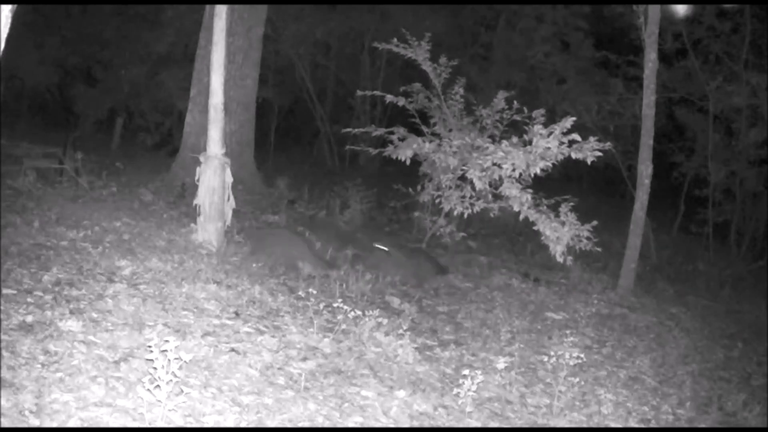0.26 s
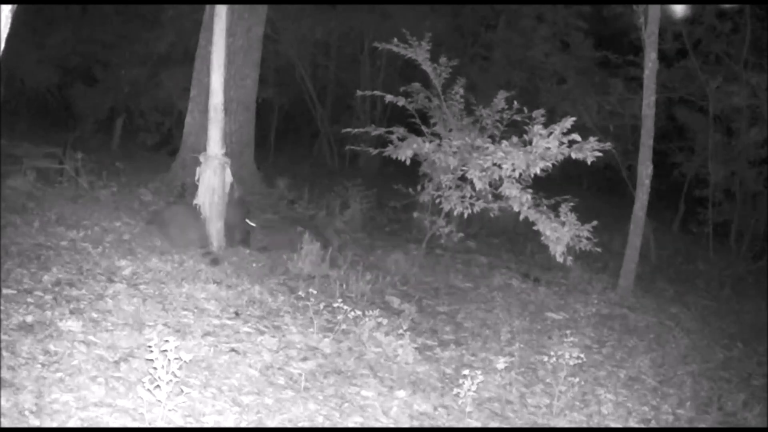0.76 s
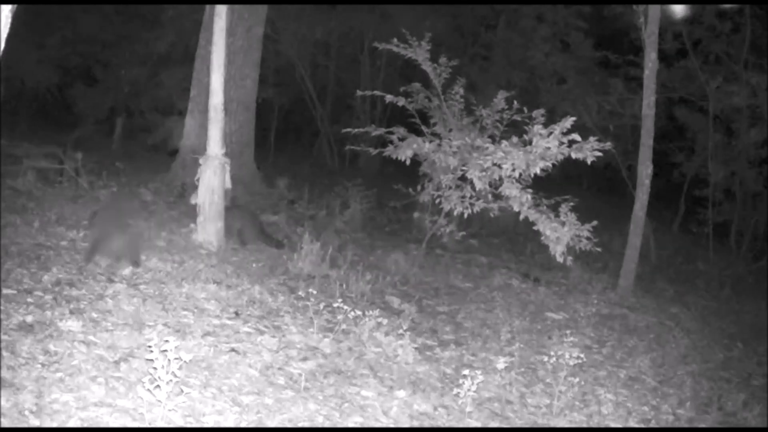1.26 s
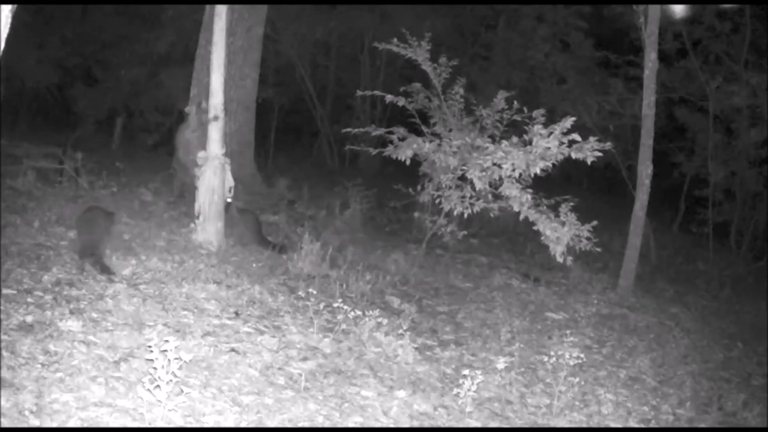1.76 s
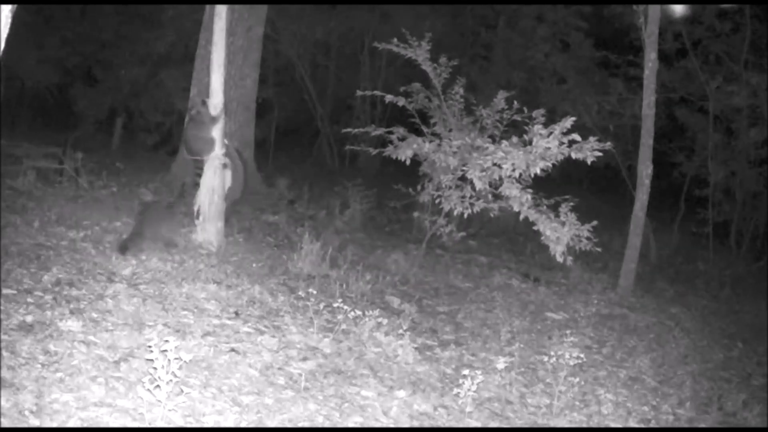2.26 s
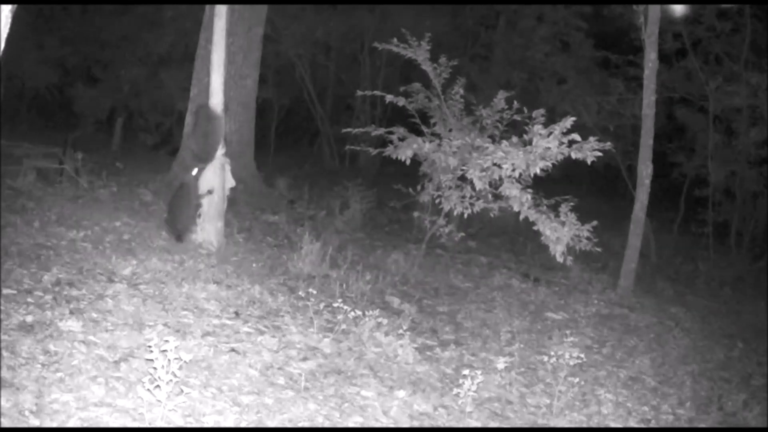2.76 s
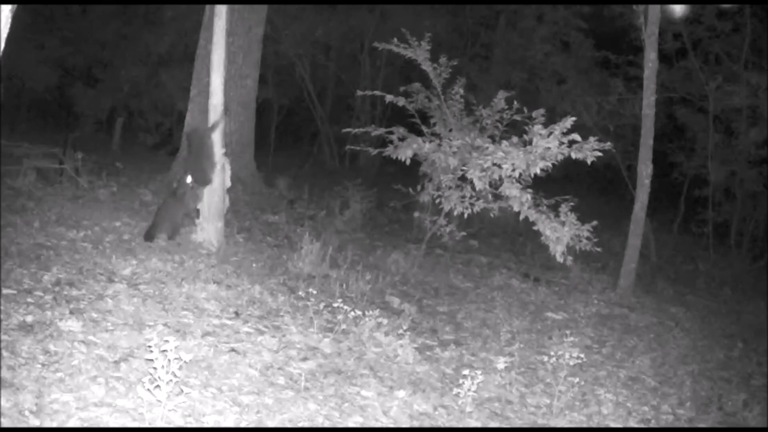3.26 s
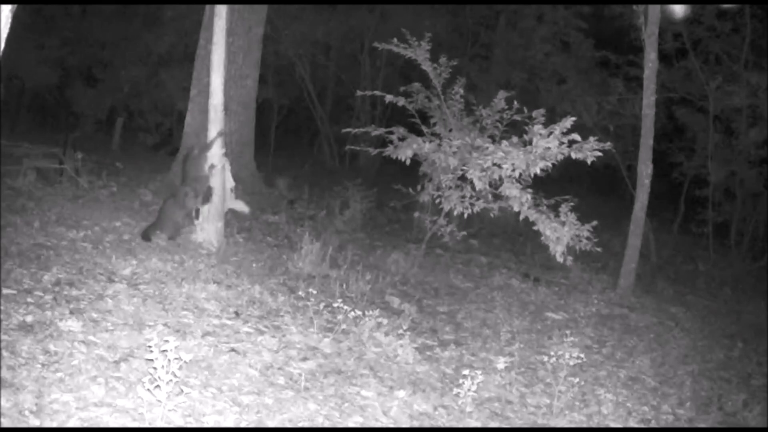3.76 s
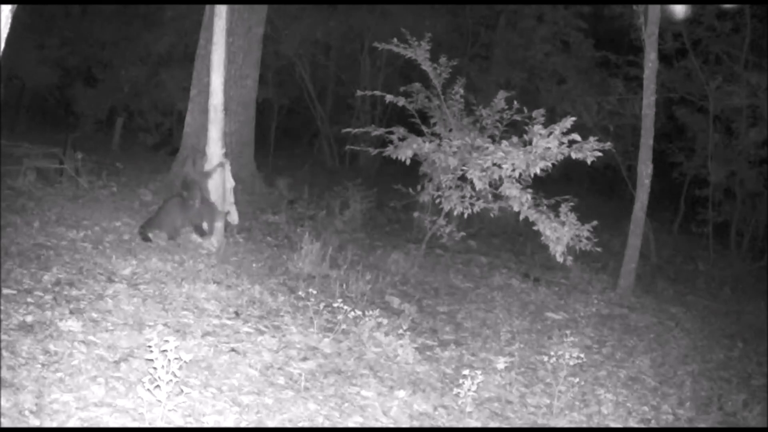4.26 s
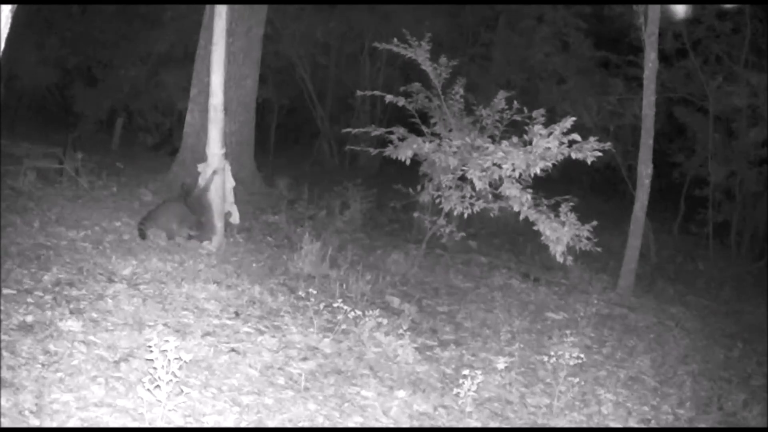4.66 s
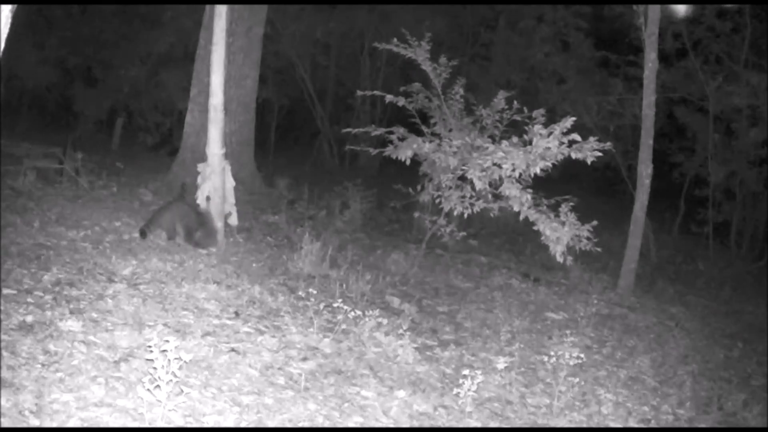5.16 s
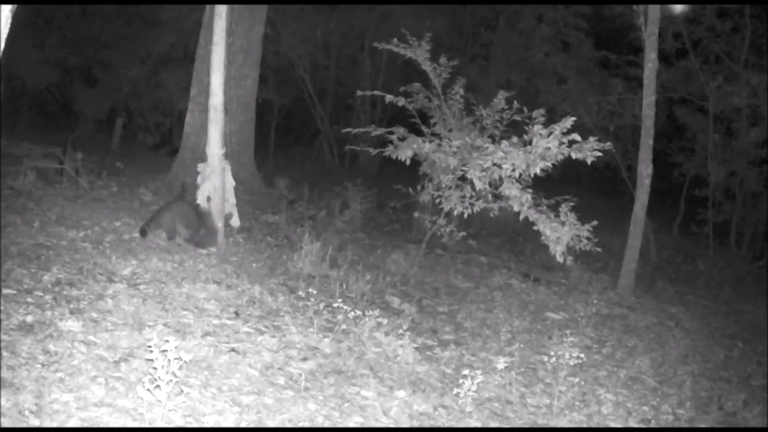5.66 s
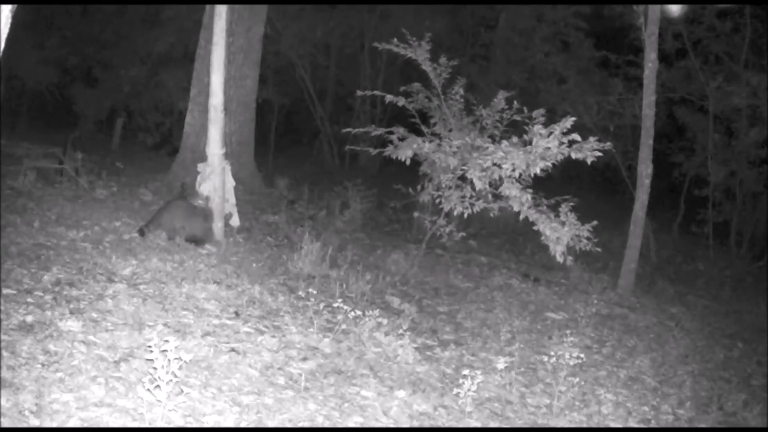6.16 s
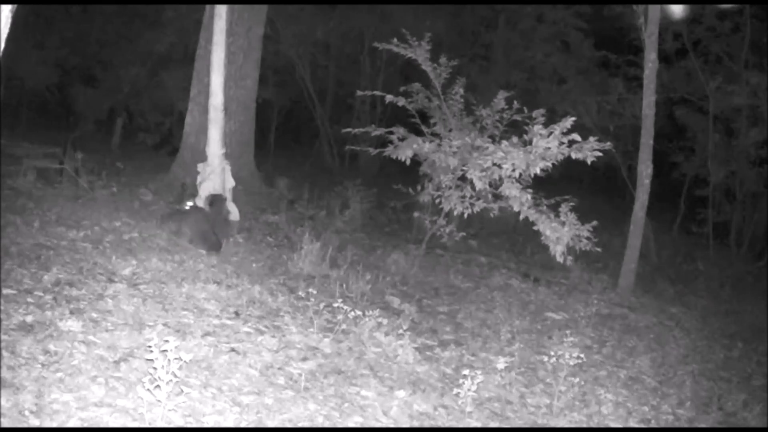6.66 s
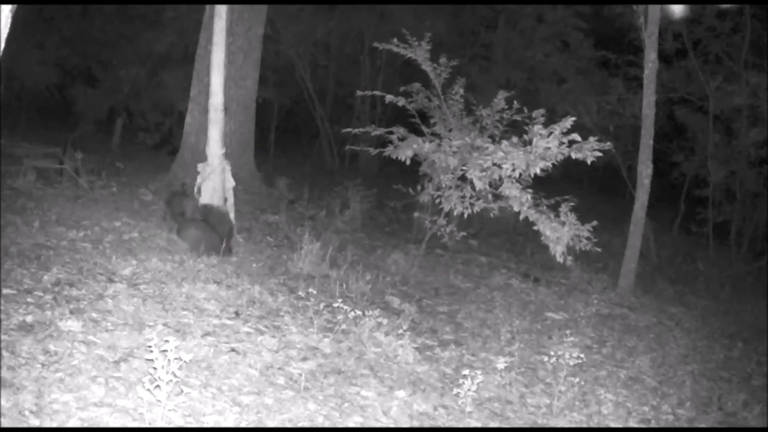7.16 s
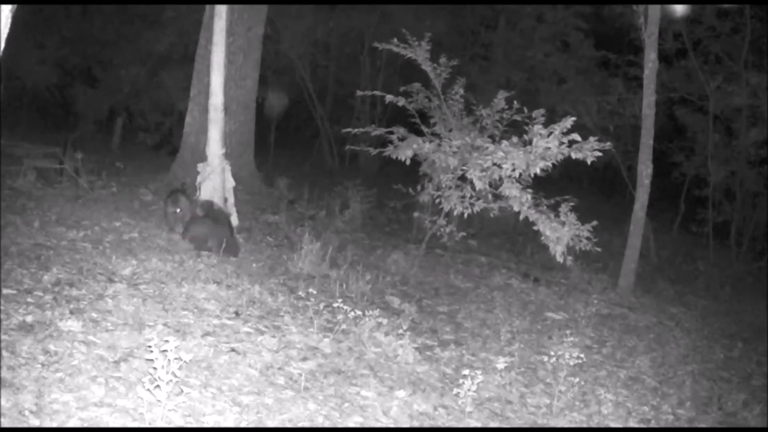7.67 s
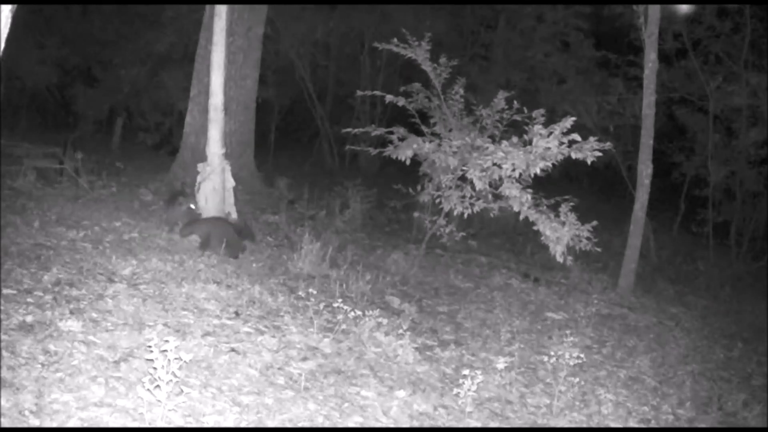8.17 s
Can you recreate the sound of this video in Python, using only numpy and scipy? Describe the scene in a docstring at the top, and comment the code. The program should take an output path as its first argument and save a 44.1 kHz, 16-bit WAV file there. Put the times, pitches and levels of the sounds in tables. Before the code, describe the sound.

Continuous shrill crickets pulse together outdoors at night, with fainter lower and higher insect trills behind. A katydid repeats short four-part rasps, answered once by a second. Over this, animals scuffling by a tree crack twigs with tiny dry clicks and ticks, busiest in the first half, and crush leaves briefly near the start. Faint airy hiss and mains-like hum sit underneath. Narrow-band single microphone, slight woodland blur, no voices.

```python
"""A wood at night: a dense chorus of high crickets throbs, with fainter tree crickets low and ground crickets
a little above. Two katydids rasp phrases of four strokes; animals scuffle in leaves, snap twigs, bump softly.
Cricket strokes are short sinking tones; katydid teeth excite wing resonances; twigs are decaying modes,
leaves bursts of filtered crackle, and bumps sinking tones. Far air is shaped noise, and mains and
machinery hum is steady sines. One microphone with a narrow band feeds both channels."""
import sys
import numpy as np
from scipy import signal
from scipy.fft import rfft, irfft, next_fast_len
from scipy.io import wavfile
from scipy.ndimage import uniform_filter1d, map_coordinates

SR = 44100
rng = np.random.default_rng(int(sys.argv[2]) if len(sys.argv) > 2 else 0)


def transcribe(u):
    """Save the signal u as a 16-bit wav file named by the first command-line argument.

    u: samples, shape (n,) or (channels, n), limited to [-1, 1]; the rate is SR.
    q: integer samples, one column per channel.
    """
    v = np.clip(np.atleast_2d(u).T, -1, 1)
    q = np.round(v * 32767).astype(np.int16)
    wavfile.write(sys.argv[1], SR, q)


def elevation(decibels):
    """Turn decibel levels (scalar or array-like) into linear amplitude ratios."""
    levels = np.asarray(decibels, float)
    return 10 ** (levels / 20)


N = 370881  # length [samples]

# High crickets: (time [s], level before throb [dB], swing of the common throb either way [dB])
HIGH_CHORUS = [(0, -51, 2.5), (.8, -50, 1), (1.9, -51, 1), (2.3, -51, -2), (3.1, -50, 2), (4.2, -51.5, 1.5),
               (5.5, -51, 2), (6.6, -50, 1), (7.7, -52, 0.8), (8.41, -49, 2)]
# Fainter choruses: tree crickets, low, and ground crickets, a little above the high ones:
# (time [s], tree cricket level [dB], ground cricket level [dB])
FAINTER_CHORUSES = [(0, -66.5, -58), (.5, -68.5, -61.5), (1, -70.5, -63), (2.3, -69.5, -60.5),
                    (3.7, -69.5, -63.5), (4.8, -68.5, -61), (5.4, -69, -63.5), (6, -67.5, -62.5),
                    (6.8, -69, -62.5), (7.4, -66, -63), (8.41, -68.5, -57.5)]
# Common throb before and after the regrouping: (time of a crest [s], crest to crest [s])
THROB_BOUTS = [(0.084, 0.361), (2.839, .357)]
# Phrases of four wing strokes:
# (time [s], level of first stroke before scatter [dB], stroke to stroke [s], change per stroke [dB])
FIRST_PHRASES = [(.224, -60.5, 0.093, 1), (1.538, -55.5, .094, -1), (3.018, -59, 0.098, 0),
                 (4.548, -60, 0.095, 0.6), (6.031, -58.5, 0.097, 0.1), (7.461, -60.5, 0.098, 1)]
SECOND_PHRASES = [(3.858, -58, 0.081, -0.96)]  # second katydid, same columns
# Wing resonances: (frequency [Hz], width [Hz], relative gain [dB], delay within the stroke [s])
FIRST_WING = [(3220, 400, -4.5, .01), (3710, 450, -2.5, 0.0069), (3970, 140, -1, 0.0027),
              (4184, 100, 1.5, 0.011), (4390, 120, -1, 0.001), (4510, 120, 3, -0.017),
              (4716, 130, 3, -.006), (4920, 260, 0.5, -.008), (5350, 640, -6, -.008)]
SECOND_WING = [(3430, 270, -2.5, 0.001), (5000, 900, -8.5, 0.001)]  # second katydid, same columns
# Paws in the leaves: (time [s], length [s], level [dB], centre [Hz], width [Hz])
LEAF_SCUFFS = [(0.532, 0.085, -61.5, 1700, 1200), (0.534, 0.079, -61, 4200, 2000),
               (0.924, 0.11, -63.5, 3000, 4000), (1.286, 0.038, -48, 6760, 4000),
               (1.289, 0.21, -60, 3000, 5000), (1.292, .03, -61, 1400, 2000),
               (1.432, .06, -64.5, 1500, 2000), (1.34, 0.039, -59, 5000, 3000),
               (1.428, 0.021, -51, 5540, 5000), (1.451, 0.052, -54, 5000, 6000),
               (2.199, 0.038, -66.5, 990, 1200), (2.656, 0.23, -64.5, 2500, 3500),
               (3.203, 0.21, -64, 1490, 2000), (4.674, 0.05, -62.5, 1300, 1600),
               (4.74, 0.088, -65, 1500, 1800), (7.087, 0.018, -63.5, 1750, 400),
               (7.135, 0.031, -66, 4000, 2000)]
# Louder twig snaps: (time [s], body level [dB], thud level [dB], crack level [dB], body pitch [Hz], body t60 [s])
TWIG_SNAPS = [(0.060, -47, -47.5, -46, 1670, 0.0043), (.534, -56, -46.5, -60, 1750, .004),
              (.552, -49, -60, -61, 1690, .004), (1.294, -45.5, -58, -50, 900, .003),
              (1.437, -55, -65, -58, 1800, .003), (2.046, -54, -50, -56, 1200, .004),
              (2.066, -34.5, -39.5, -39, 1630, 0.0036), (2.152, -49, -55, -60, 1060, 0.004),
              (2.3508, -38, -58, -48, 1560, 0.003), (2.611, -46, -66, -62, 1440, 0.0037),
              (2.9226, -36.5, -34, -33, 1530, 0.0047), (2.984, -53, -62, -60, 1420, .004),
              (3.193, -40.5, -63, -57, 1530, 0.0035), (3.22, -46.5, -65, -41.5, 985, .004),
              (3.311, -47, -60, -55, 950, .004), (3.701, -51, -52, -57, 1760, .004),
              (3.732, -44, -62, -58, 1420, 0.0039), (3.7785, -35, -54, -46, 1220, 0.0022),
              (4.049, -44, -64, -52, 1840, 0.004), (4.122, -48, -67, -45, 1750, .005),
              (4.415, -55, -61, -52, 942, 0.0037), (4.681, -53, -69, -52, 1500, .003),
              (4.695, -50, -63, -50, 2300, .003), (4.698, -45, -54, -56, 1500, .004),
              (4.796, -53, -54, -59, 1500, .004), (5.687, -46, -59, -63, 1600, .003),
              (6.474, -51, -65, -52, 1020, .004), (6.604, -49.5, -53, -41, 1090, 0.0033),
              (7.0568, -47, -74, -56, 1950, 0.0034), (7.0685, -52, -75, -65, 2250, .008),
              (7.0703, -46, -76, -56, 1800, 0.013), (7.251, -51, -67, -63, 2080, .004),
              (8.132, -50, -54, -62, 1220, 0.0027), (8.248, -42, -54, -39, 1280, 0.0038)]
# Soft low bumps: (time [s], length [s], level before roughness [dB], first pitch [Hz], last pitch [Hz])
SOFT_BUMPS = [(0.546, 0.02, -52.5, 130, 100), (3.698, .013, -52, 270, 190), (4.308, 0.021, -60, 200, 150),
              (6.263, 0.01, -55.5, 343, 261), (8.339, .038, -59.5, 450, 367)]
# Hum lines: (frequency [Hz])
HUM_PITCHES = [42.57, 59.2, 85.1, 119.98, 240.05, 360.05]
# The same lines in turn: (rms level [dB], scale of phase wander [rad])
HUM_LINES = [(-68.5, 0.22), (-77, 0.41), (-80, 0.56), (-65.5, 0.025), (-79, 0.064), (-87.5, .1)]
# Spectrum of the far air: (frequency [Hz], relative level per Hz [dB])
AIR_SPECTRUM = [(9, -37.5), (15, -14), (48, -3.5), (92, -8.5), (160, -13), (250, -17.5), (340, -19),
                (1750, -22), (3000, -21.5), (5600, -23), (8000, -21.5)]
# Loudness of the far air: (time [s], level [dB])
AIR_LOUDNESS = [(0, -57), (1.5, -56.5), (2.6, -58), (3.9, -57), (5.5, -58.5), (6.2, -57.5), (8.41, -58)]
# Microphone response: (frequency [Hz], gain [dB])
MICROPHONE_RESPONSE = [(5600, 1), (7400, 0), (7800, -5.5), (8050, -18.5), (8220, -25), (8320, -52.5)]
# Twig thud: (frequency [Hz], t60 [s]); crack modes: (frequency [Hz], t60 [s], level against the crack [dB])
THUD, CRACK = (525, 0.0042), [(3000, 0.0029, -4.5), (4260, 0.004, -4)]

FLATTER_SINGERS_DB, FLUTTER_DB = -10, 0.8  # flatter high crickets against the rest; chance unevenness
REGROUP_S, THROB_LEAN_RAD = 2.25, 0.21  # start of the second bout; skew of the throb
STROKE_S, LAST_STROKE_S, STROKE_EDGE_S = 0.06, 0.065, 0.025  # the last stroke is drawn out
STROKE_SCATTER_DB, MODE_WAVER_DB = -0.27, -1  # no two strokes are alike
TOOTH_RATE_HZ, TOOTH_JITTER = 402, .11  # teeth a second; scatter of a gap, as a share of the mean
TOOTH_SCATTER_DB, SCRAPE_DB = 2.5, -14  # scatter of tooth size; friction noise against the teeth
FAINT_SNAPS, FAINT_T60_S, FAINT_HZ = 6, .0046, (950, 1750)  # number; ring; range of body pitch
FAINT_DB, FAINT_SPREAD_DB = (-56.5, -64, -62), 1  # body, thud, crack; spread either way
SNAP_RISE, SNAP_LOW_HZ = 0.041, 190  # rise time over t60; low cut
SPLINTER_DB, SPLINTER_T60_S = -11.5, 0.034  # splintering noise against the body; its decay
BUMP_ROUGH_DB = 3  # unevenness within a bump


def unit(x):
    """Normalisation: divides by the root mean square."""
    return x / np.sqrt(np.mean(x ** 2) + 1e-20)


def along(points, hz):
    """Logarithmic pitch: interpolates (frequency, value) points on a log axis."""
    f, v = np.transpose(points)
    return np.interp(np.log(hz + 1), np.log(f + 1), v)


def curves(rows):
    """Linear interpolation: one value per sample for each column after the time."""
    s, *cols = np.transpose(rows)
    return [np.interp(np.arange(N) / SR, s, c) for c in cols]


def wobble(rate):
    """Band-limited chance: a smooth random curve through rate knots a second."""
    knots = rng.standard_normal(int(N * rate / SR) + 4)
    return map_coordinates(knots, [np.arange(N) * rate / SR])


def filtered(x, response):
    """Linear filtering: multiplies the spectrum by a complex frequency response."""
    m = next_fast_len(len(x) + 8192)
    return irfft(rfft(x, m) * response(np.fft.rfftfreq(m, 1 / SR)), m)[:len(x)]


def resonance(f, hz, width):
    """Damped oscillator: the causal response of one mode."""
    return 1j * f * width / (hz * hz - f * f + 1j * f * width)


def woods(x, t60, wet):
    """Multiple scattering: trunks and moving leaves blur a sound, with a new tail every fifth of a second."""
    hop = SR // 5
    count = N // hop + 2
    padded = np.pad(x, (hop, 2 * hop))
    pieces = np.lib.stride_tricks.sliding_window_view(padded, 2 * hop)[::hop][:count]
    window = np.sin(np.pi * np.arange(2 * hop) / (2 * hop))
    tails = rng.standard_normal((count, hop)) * elevation(-60 * np.arange(hop) / SR / t60)
    tails = tails / np.linalg.norm(tails, axis=1, keepdims=True)
    blur = signal.fftconvolve(pieces * window, tails, axes=1)
    where = hop * np.arange(count)[:, None] + np.arange(blur.shape[1])
    scattered = np.bincount(where.ravel(), blur.ravel())[hop:hop + N]
    wet = np.clip(wet, 0, 1)
    return np.sqrt(1 - wet) * x + np.sqrt(wet) * scattered


def trill(count, hz, spread_hz, scatter_hz, rate, rate_spread, stroke_s, fall_hz, wander_db):
    """Stridulation: each cricket closes its wings at its own rate, every stroke a short tone sinking in pitch."""
    beats = np.arange(int(1.5 * 80 * N / SR))  # ample strokes to fill the scene
    pace = rate * np.exp(rate_spread * rng.standard_normal((count, 1)))
    size, detune, phase, late = rng.standard_normal((4, count, len(beats)))
    start = (beats + rng.random((count, 1)) + np.cumsum(.03 * late, axis=1)) / pace
    # each singer swells and fades
    mood = unit(uniform_filter1d(rng.standard_normal(size.shape), size=30, axis=1))
    pitch = hz + spread_hz * np.linspace(-1, 1, count)[:, None] + scatter_hz * detune
    heard = (start > 0) & (start < N / SR)
    t = np.arange(int(stroke_s * SR)) / SR
    shape = np.sin(np.pi * (t / stroke_s) ** 0.8)
    turns = pitch[heard][:, None] * t + fall_hz * (t - t ** 2 / stroke_s) / 2 + phase[heard][:, None]
    strength = elevation(wander_db * mood + 0.5 * size)[heard][:, None]
    tones = strength * shape * np.sin(2 * np.pi * turns)
    where = (start[heard] * SR).astype(int)[:, None] + np.arange(len(t))
    return np.bincount(where.ravel(), tones.ravel(), N)[:N]


def crickets():
    """Incoherent addition: many singers at three main pitches blur together; the high ones throb in step."""
    chorus_db, depth_db = curves(HIGH_CHORUS)
    tree_db, ground_db = curves(FAINTER_CHORUSES)
    t = np.arange(N) / SR
    first_bout, second_bout = [(t - crest) / period for crest, period in THROB_BOUTS]
    turn = 2 * np.pi * np.where(t < REGROUP_S, first_bout, second_bout)
    # the lean makes a swell of positive depth rise faster than it falls
    throb_db = depth_db * np.cos(turn + THROB_LEAN_RAD * np.cos(turn)) + FLUTTER_DB * wobble(9)
    high = trill(count=20, hz=6376, spread_hz=117, scatter_hz=73, rate=70, rate_spread=.2,
                 stroke_s=0.0075, fall_hz=200, wander_db=0.04)
    flatter = trill(count=8, hz=6066, spread_hz=90, scatter_hz=80, rate=70, rate_spread=.2,
                    stroke_s=0.007, fall_hz=200, wander_db=1.0)
    high = unit(high) + elevation(FLATTER_SINGERS_DB) * unit(flatter)
    tree = trill(count=10, hz=2291, spread_hz=68.0, scatter_hz=36.4, rate=62, rate_spread=.03,
                 stroke_s=.011, fall_hz=106, wander_db=0.3)
    ground = trill(count=14, hz=6760, spread_hz=350, scatter_hz=265, rate=49, rate_spread=.015,
                   stroke_s=0.006, fall_hz=585, wander_db=1.0)
    return (elevation(chorus_db + throb_db) * unit(woods(high, t60=0.38, wet=0.23))
            + elevation(tree_db) * unit(woods(tree, t60=0.28, wet=0.25))
            + elevation(ground_db) * unit(woods(ground, t60=0.54, wet=0.67)))


def night_air():
    """Superposition: shaped noise makes far rumble and patchy hiss; sines make the mains and machinery hum."""
    z = signal.stft(rng.standard_normal(N + 512), nperseg=512)[2]
    patches = uniform_filter1d(rng.standard_normal(z.shape), size=8, axis=0)  # across frequency
    patches = uniform_filter1d(patches, size=6, axis=1)  # across time
    noise = signal.istft(z * elevation(1.66 * unit(patches)), nperseg=512)[1][:N]
    coloured = unit(filtered(noise, lambda f: elevation(along(AIR_SPECTRUM, f))))
    air = elevation(curves(AIR_LOUDNESS)[0] + 0.63 * wobble(3.016)) * coloured
    t = np.arange(N) / SR
    drift = wobble(1.5)  # shared by all lines
    hum = np.zeros(N)
    for hz, (db, wander) in zip(HUM_PITCHES, HUM_LINES):
        phase = wander * drift + 2 * np.pi * rng.random()
        hum += elevation(db) * np.sqrt(2) * np.sin(2 * np.pi * hz * t + phase)
    return air + hum


def twigs():
    """Modal decay: a snap rings the stick's body, with a thud below and a crack above; faint ones fall by chance."""
    luck = rng.random((FAINT_SNAPS, 5))
    faint_db = np.array(FAINT_DB) + FAINT_SPREAD_DB * (2 * luck[:, 1:4] - 1)
    faint_hz = np.interp(luck[:, -1], [0, 1], FAINT_HZ)
    faint = np.column_stack([luck[:, 0] * N / SR, faint_db, faint_hz, np.full(FAINT_SNAPS, FAINT_T60_S)])
    s, body_db, thud_db, crack_db, body_hz, body_t60 = np.vstack([TWIG_SNAPS, faint]).T[..., None]
    t = np.arange(SR // 40) / SR

    def ring(hz, t60, db):
        """Damped vibration: a sine under a quick rise and exponential decay of given peak."""
        swell = elevation(-60 * t / t60) * (1 - np.exp(-t / t60 / SNAP_RISE))
        return elevation(db) * swell / swell.max(axis=-1, keepdims=True) * np.sin(2 * np.pi * hz * t)

    snap = ring(body_hz, body_t60, body_db) + ring(*THUD, thud_db)
    snap = snap + sum(ring(hz, t60, crack_db + db) for hz, t60, db in CRACK)
    # smoothing dulls the splintering; the 2 makes up most of the lost level
    splinters = 2 * uniform_filter1d(rng.standard_normal(snap.shape), size=5, axis=1)
    snap = snap + elevation(body_db + SPLINTER_DB - 60 * t / SPLINTER_T60_S) * splinters
    where = (s * SR).astype(int) + np.arange(len(t))
    placed = np.bincount(where.ravel(), snap.ravel(), N)[:N]
    thin = filtered(placed, lambda f: 1j * f / (SNAP_LOW_HZ + 1j * f))
    return woods(thin, t60=.07, wet=.07)


def katydid(phrases, wing):
    """Forced resonance: a scraper drags over a file, and nearly even tooth clicks ring the modes of the wing."""
    start, level_db, gap, change_db = np.transpose(phrases)[..., None]
    stroke = np.arange(4)
    s = start + gap * stroke
    scatter = rng.standard_normal((len(phrases), len(stroke)))
    db = level_db + change_db * stroke + STROKE_SCATTER_DB * scatter
    end = s + np.where(stroke == stroke[-1], LAST_STROKE_S, STROKE_S)
    gaps, sizes = rng.standard_normal((2, int(600 * N / SR)))
    strikes = (np.cumsum(1 + TOOTH_JITTER * gaps) / TOOTH_RATE_HZ * SR).astype(int)
    teeth = unit(np.bincount(strikes, elevation(TOOTH_SCATTER_DB * sizes), N)[:N])
    teeth = teeth + elevation(SCRAPE_DB) * rng.standard_normal(N)
    corners = np.stack([s - STROKE_EDGE_S, s + STROKE_EDGE_S, end - STROKE_EDGE_S, end + STROKE_EDGE_S], axis=-1)
    corners = np.maximum.accumulate(corners.ravel())  # keeps overlapping strokes in order
    heights = np.outer(elevation(db), [0, 1, 1, 0]).ravel()
    modes_sum, rasp = np.zeros(N), np.zeros(N)
    for k, (hz, width, gain_db, late) in enumerate(wing):
        # neighbouring modes have opposite sign
        mode = filtered(teeth, lambda f: (-1) ** k * elevation(gain_db) * resonance(f, hz, width) ** 2)
        drag = np.interp(np.arange(N) / SR - late, corners, heights)
        modes_sum += mode
        rasp += mode * drag * elevation(MODE_WAVER_DB * wobble(14))
    return woods(rasp / np.std(modes_sum), t60=0.46, wet=0.41)


def leaves():
    """Granular excitation: each scuff is a burst of crackling noise, coloured by what the paw crushes."""
    out = np.zeros(N + SR)
    for s, length, db, hz, width in LEAF_SCUFFS:
        crackle_db = 4.5 * unit(uniform_filter1d(rng.standard_normal(SR // 2), size=14))
        crackle = rng.standard_normal(SR // 2) * elevation(crackle_db)
        crush = filtered(crackle, lambda f: resonance(f, hz, width))
        part = np.arange(SR // 2) / SR / length
        burst = crush * np.clip(np.minimum(part / 0.15, (1.15 - part) / .3), 0, 1)
        # energy equal to the stated rms level held for the length
        out[round(s * SR):][:SR // 2] += elevation(db) * burst * np.sqrt(length * SR) / np.linalg.norm(burst)
    return woods(out[:N], t60=0.094, wet=0.13)


def bumps():
    """Frequency glide: something soft lands or rubs, giving a short low tone that sinks."""
    out = np.zeros(N + SR)
    for s, length, db, first_hz, last_hz in SOFT_BUMPS:
        part = np.arange(int(length * SR)) / SR / length
        turns = length * (first_hz * part + (last_hz - first_hz) * part ** 2 / 2)
        tone = np.sin(np.pi * part) * np.sin(2 * np.pi * turns)
        out[round(s * SR):][:len(part)] += elevation(db) * tone
    return out[:N] * elevation(BUMP_ROUGH_DB * wobble(120))


def scene():
    """Linear superposition: the pressures of all sources add at one microphone."""
    mono = crickets() + night_air() + twigs()
    mono = mono + katydid(FIRST_PHRASES, FIRST_WING) + katydid(SECOND_PHRASES, SECOND_WING)
    mono = mono + leaves() + bumps()
    return np.array([mono, mono])


def roll_off(x):
    """The treble ends steeply here."""
    return signal.sosfilt(signal.butter(12, 8450, fs=SR, output="sos"), x)


def record(dry):
    """Band limitation: the microphone chain rolls off steeply near 8 kHz and feeds both channels."""
    narrow = filtered(dry[0], lambda f: elevation(along(MICROPHONE_RESPONSE, f)))
    return roll_off(np.array([narrow, narrow]))


dry = scene()
out = record(dry)
transcribe(out)
```